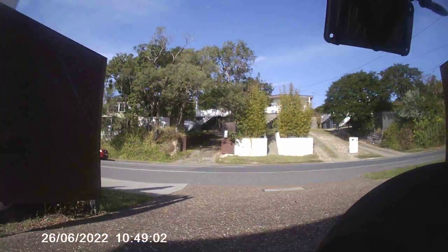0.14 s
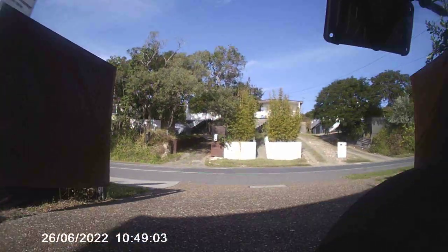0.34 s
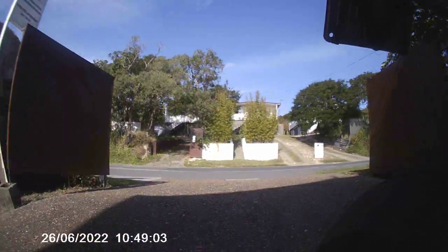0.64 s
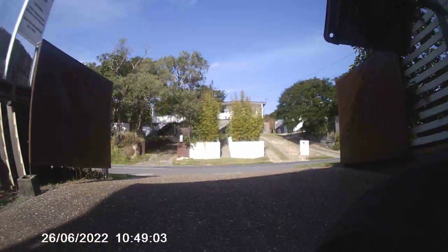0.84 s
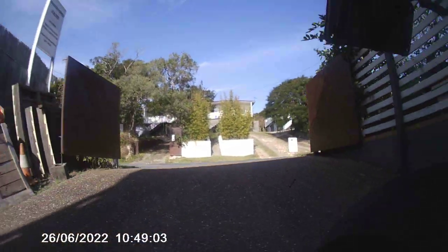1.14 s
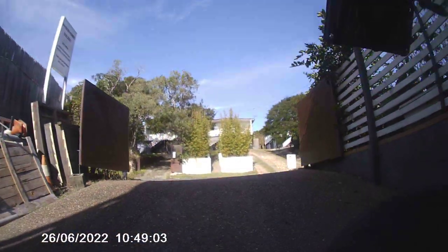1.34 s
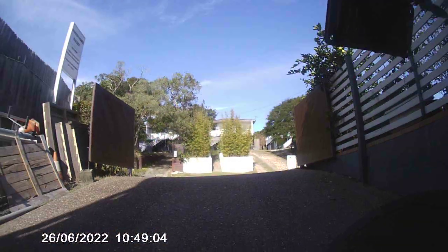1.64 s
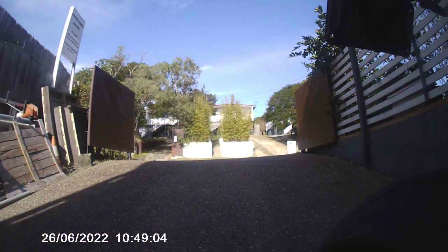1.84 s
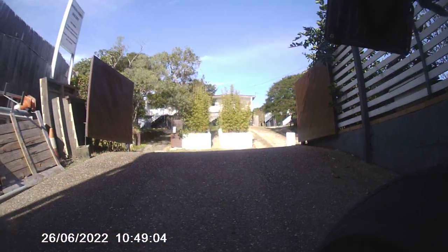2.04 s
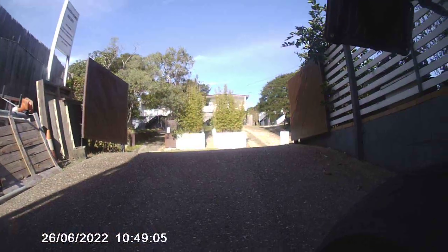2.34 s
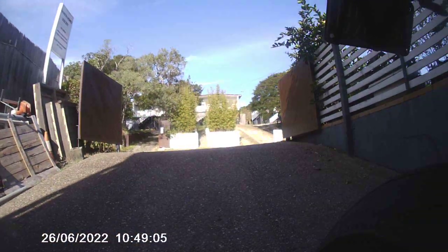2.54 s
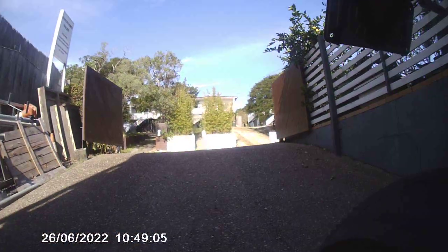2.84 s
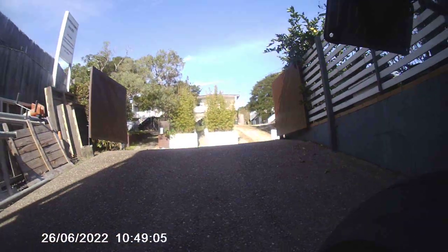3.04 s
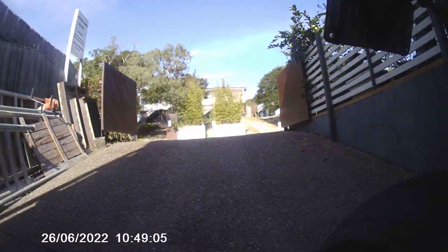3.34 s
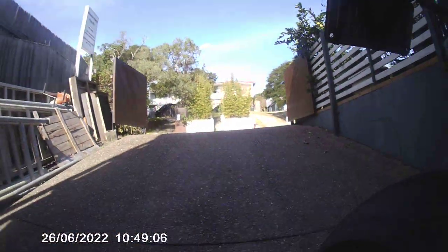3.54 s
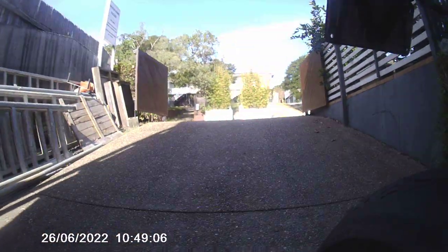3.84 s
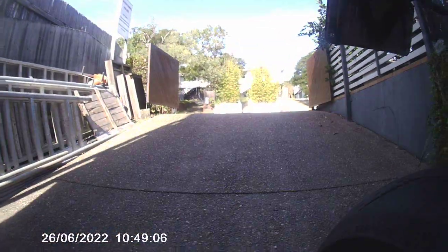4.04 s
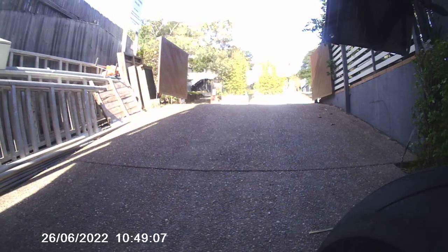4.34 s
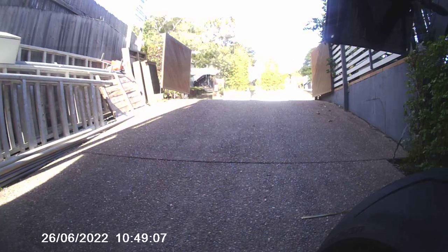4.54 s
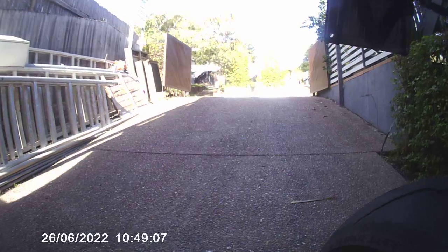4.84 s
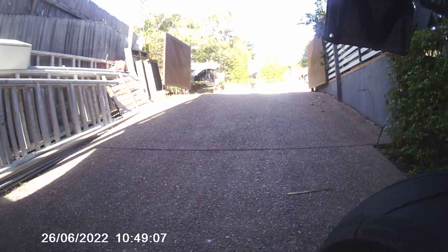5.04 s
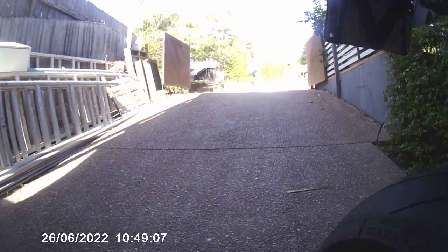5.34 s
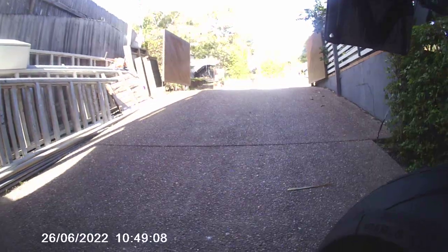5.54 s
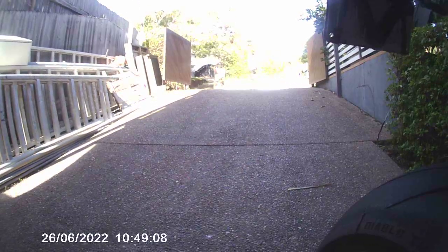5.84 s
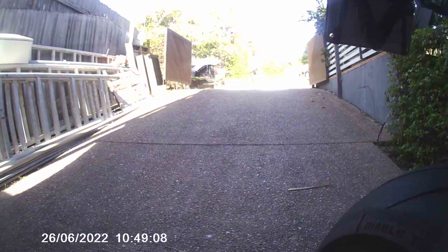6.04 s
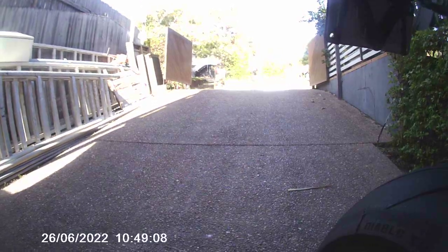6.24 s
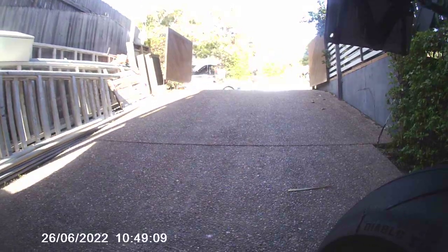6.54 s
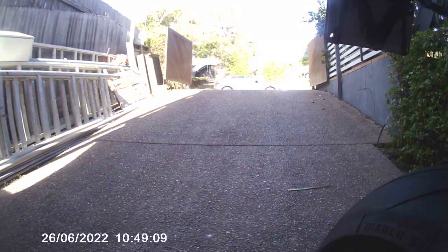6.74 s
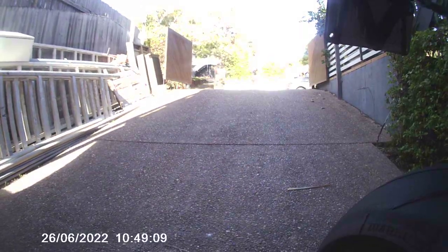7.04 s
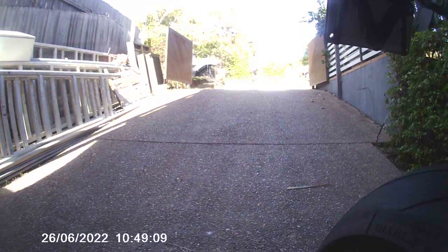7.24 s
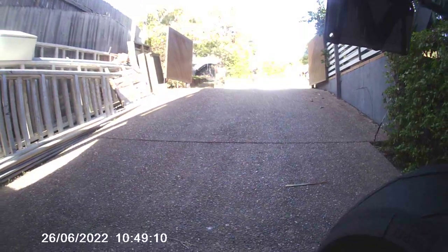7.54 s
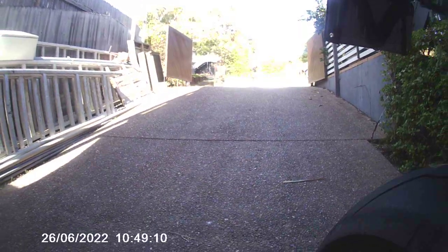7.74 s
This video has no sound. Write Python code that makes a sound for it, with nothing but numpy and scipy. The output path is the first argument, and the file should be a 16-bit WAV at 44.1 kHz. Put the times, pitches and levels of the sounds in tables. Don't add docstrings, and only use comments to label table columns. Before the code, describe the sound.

A loud unsilenced four-cylinder motorcycle idles lumpily in a driveway, blatting and clipping the close microphone, stumbling on misfires with raspy gas and clatter.

```python
import sys
import numpy as np
from scipy import signal
from scipy.fft import rfft, irfft
from scipy.io import wavfile

SR = 44100
rng = np.random.default_rng(int(sys.argv[2]) if len(sys.argv) > 2 else 0)


def materialize(psi):
    bounded = np.clip(np.atleast_2d(psi).T, -1, 1)
    quanta = np.round(bounded * 32767).astype(np.int16)
    wavfile.write(sys.argv[1], SR, quanta)


def attenuation_scalar(level_db):
    decades = np.asarray(level_db, float) / 20
    return 10 ** decades


N = 348371
BEFORE = SR // 10


def shaped(points):
    hz, db = np.transpose(points)
    bins = np.arange(N // 2 + 1) * SR / N + 1
    gain = attenuation_scalar(np.interp(np.log(bins), np.log(hz), db))
    x = irfft(rfft(rng.standard_normal(N)) * gain, N)
    return x / x.std()


def ring(modes, t):
    t = np.maximum(t, 0)
    return sum(size * np.exp(-np.pi * width * t) * np.sin(2 * np.pi * hz * t) for hz, width, size in modes)


def strike(times, sizes, response, lead=0):
    at = np.clip(times * SR + BEFORE, 0, N + BEFORE - 1).astype(int)
    impulses = np.bincount(at, sizes, N + BEFORE)
    start = lead + BEFORE
    return signal.fftconvolve(impulses, response)[start:start + N]


# (frequency [Hz], level [dB per Hz])
CASE_SPECTRUM = [(1500, -30), (2500, -20.5), (3000, -3.5), (3700, -12), (4500, 10), (5200, -2), (5900, 0),
                 (6800, -33), (12000, -67.5)]


def valves(times, db, steady):
    chance = rng.standard_normal((len(times), 6))
    seating = np.array([.004, .011, .017])
    at = times[:, None] + seating + 0.0017 * chance[:, :3]
    sizes = attenuation_scalar(4.0 * chance[:, 3:])
    decay = np.exp(-np.arange(SR // 50) / SR / 0.002)
    knocks = strike(at.ravel(), sizes.ravel(), decay)
    return attenuation_scalar(db) * (steady + knocks) * shaped(CASE_SPECTRUM)


# (frequency [Hz], level [dB per Hz])
GAS_SPECTRUM = [(300, -19.5), (700, -11), (1000, -5), (1450, 0.5), (1900, -5), (2450, -19.5), (3000, -13),
                (3700, -16.5), (7000, -36.5), (12000, -69.5)]


def rasp(times, db, steady):
    t = np.arange(SR // 20) / SR
    gusts = attenuation_scalar(1.3 * rng.standard_normal((len(times), 2)))
    burst = t / 0.0014 * np.exp(1 - t / 0.0019)
    opening = strike(times + 0.00072, gusts[:, 0], burst)
    returning = 0.41 * strike(times + 0.0067, gusts[:, 1], burst)
    return attenuation_scalar(db) * (steady + (opening + returning)) * shaped(GAS_SPECTRUM)


def flutter(times, sizes, db):
    t = np.arange(SR // 10) / SR
    flow = strike(times, sizes, np.exp(-t / .026))
    spectrum = [(50, -28), (110, -11), (230, -6.0), (300, 4.5), (460, -5.0),
                (650, -14.5), (900, -36.0), (3000, -74.5)]
    return attenuation_scalar(db) * flow * shaped(spectrum)


# (time [s], speed [firings per s])
IDLE_SPEED = [(0.0, 41.99), (0.4, 46.42), (1.0, 41.49), (1.38, 41.31), (1.87, 42.78), (2.35, 40.41),
              (2.81, 47.13), (3.1, 45.1), (3.87, 47.31), (4.18, 43.02), (4.76, 42.34), (5.18, 45.35),
              (5.6, 45.14), (6.08, 43.48), (6.44, 45.35), (6.95, 39.21), (7.48, 40.22), (7.9, 42.3)]
# (time [s], change at its deepest [firings per s])
CRANK_LURCHES = [(0.101, -5.25), (0.326, -4.43), (0.492, -2.33), (0.719, -2.49), (0.847, 3.1),
                 (1.199, 2.91), (1.635, -3.74), (1.783, 3.86), (2.055, 3.78), (2.207, 5.35), (2.409, 3.33),
                 (2.711, 0.86), (3.036, 5.21), (3.279, 1.98), (3.524, -2.76), (3.741, -2.96),
                 (3.937, -4.74), (4.044, 2.7), (4.268, 5.98), (4.507, 3.05), (4.788, 2.28), (5.368, -3.74),
                 (5.719, -1.17), (5.807, -2.71), (6.265, -2.46), (6.463, -2.36), (6.759, 4.03),
                 (6.998, 1.54), (7.119, -1.35), (7.72, -7.04)]


def crank(t):
    start, change = np.transpose(CRANK_LURCHES)
    since = np.maximum(t - start[:, None], 0) / .043
    return np.interp(t, *np.transpose(IDLE_SPEED)) + change @ (since * np.exp(1 - since))


# (time [s], level [dB])
CHARGE_LEVEL = [
    (0, -3.5),
    (2, -3.5),
    (3.5, -2.5),
    (6, -3),
    (7, -4),
    (7.9, -4.5),
]
CYLINDER_LEVEL = [1.3, -.5, -1, 1.1]


def firings(jitter_s, scatter_db):
    t = np.arange(-BEFORE, N) / SR
    turns = np.cumsum(crank(t)) / SR
    turns = turns - turns[BEFORE] - .2188
    count = np.arange(-len(CYLINDER_LEVEL), int(turns[-1]) + 1)
    chance = rng.standard_normal((len(count), 2))
    times = np.interp(count, turns, t) + jitter_s * chance[:, 0]
    charge = np.interp(times, *np.transpose(CHARGE_LEVEL))
    cylinder = np.take(CYLINDER_LEVEL, count % 4)
    return times, attenuation_scalar(charge + cylinder + scatter_db * chance[:, 1])


# (time [s], strength [share of a normal burn], cool pipe hum [size])
ODD_CHARGES = [(.150, .1, .4), (.94, 1.45, 0), (1.133, .45, .8), (1.23, 1.35, 0), (1.27, 1.35, 0),
               (1.320, .1, .8), (1.51, 1.35, 0), (1.655, .75, .2), (1.706, .45, .6), (1.80, 1.55, 0),
               (1.984, .4, .7), (2.122, .45, .8), (2.167, .15, .5), (2.21, 1.35, 0), (2.347, .1, .4),
               (2.529, .65, .6), (2.793, 0, .25), (2.899, .7, .4), (2.964, 0, 1), (3.131, .1, 1),
               (3.957, .65, .2), (4.362, .6, .6), (4.677, .55, .4), (4.700, .75, .2), (4.747, .55, .2),
               (6.501, .65, .5), (6.666, .75, 0), (7.352, .75, .1), (7.805, .75, .2)]
# (frequency [Hz], width [Hz], level [size])
COOL_PIPE = [(225, 36, 1.)]


def misfires(times, sizes):
    s, burnt, size = np.transpose(ODD_CHARGES)
    odd = np.argmin(abs(times[:, None] - s), axis=0)
    t = np.arange(SR // 10) / SR
    swell = 1 - np.exp(-t / .002)
    hum = strike(times[odd], size, swell * ring(COOL_PIPE, t))
    share = np.ones(len(times))
    share[odd] = burnt
    early_s = .0015 * np.maximum(1 - share, 0)
    return times - early_s, sizes * share, hum


# (frequency [Hz], width [Hz], level [signed size]); negative starts as suction at the open end
SHORT_HEADER = [(16, 64, 1.34), (72, 24, -.49), (128, 12, -.13), (206, 63, -3.94), (246, 27, .59),
                (276.5, 52, 1.28), (342, 174, .73)]
LONG_HEADER = [(12, 64, 1.83), (71, 23, -.49), (197, 114, -9.74), (196, 19, -.56), (232, 54, 8.47),
               (253, 27, -1.43), (330, 42, .53)]
# (ring start [ms], puff centre [ms], puff spread [ms], level [size])
BLOWDOWN = [
    (-1.7, -2.7, .7, .72),
    (-2.3, -2.2, 1.26, .64),
]


def exhaust(times, sizes):
    lead = SR // 100
    t = (np.arange(SR // 10) - lead) / SR
    out = 0
    for k, modes in enumerate((SHORT_HEADER, LONG_HEADER)):
        start, centre, spread, size = BLOWDOWN[k]
        puff = size * np.exp(-.5 * ((t * 1000 - centre) / spread) ** 2)
        blast = puff + ring(modes, t - start / 1000)
        out = out + strike(times[k::2], sizes[k::2], blast, lead)
    soft = signal.windows.gaussian(101, 11.)
    out = signal.fftconvolve(out, soft / soft.sum(), "same")
    place = np.arange(N)
    arrival = np.maximum.accumulate(place - 1.7 * out)
    return np.interp(place, arrival, out)


def scene():
    times, sizes = firings(jitter_s=.0002, scatter_db=.9)
    times, sizes, hum = misfires(times, sizes)
    sound = exhaust(times, sizes) + hum
    sound = sound + flutter(times, sizes, db=-24)
    sound = sound + rasp(times, db=-34, steady=0.85)
    sound = sound + valves(times, db=-46.5, steady=0.45)
    return sound[None]


def low_pass(x):
    return signal.sosfilt(signal.butter(12, 15800, fs=SR, output="sos"), x)


def record(dry):
    drive_db, offset, clip = 3, .035, .708
    x = np.clip(attenuation_scalar(drive_db) * (dry + offset), -clip, clip)
    smooth = signal.sosfiltfilt(signal.butter(8, 11800, fs=SR, output="sos"), x)
    x = smooth + attenuation_scalar(-11) * (x - smooth)
    return low_pass(x)


dry = scene()
out = record(dry)
materialize(out)
```